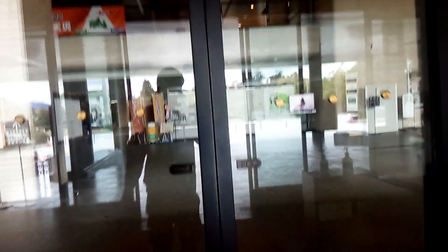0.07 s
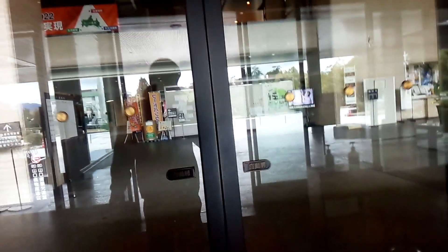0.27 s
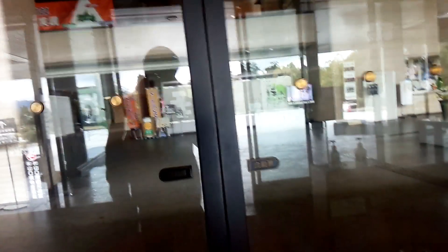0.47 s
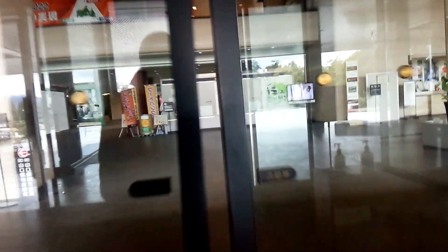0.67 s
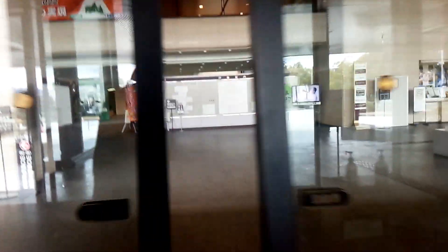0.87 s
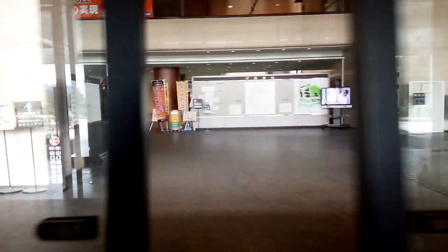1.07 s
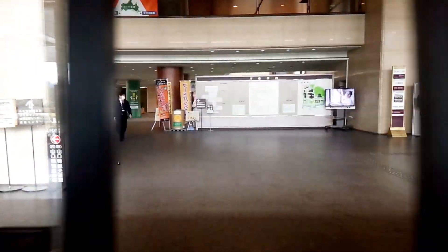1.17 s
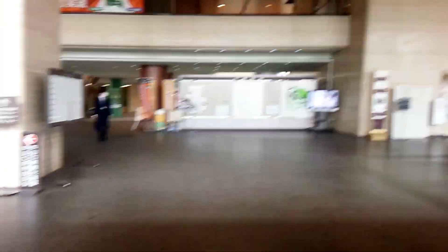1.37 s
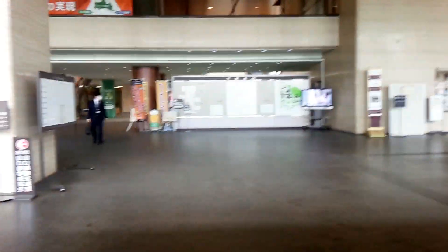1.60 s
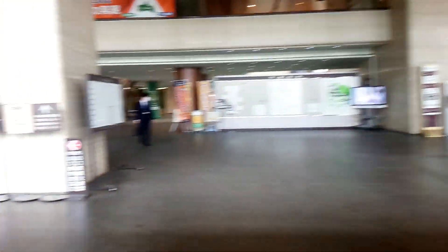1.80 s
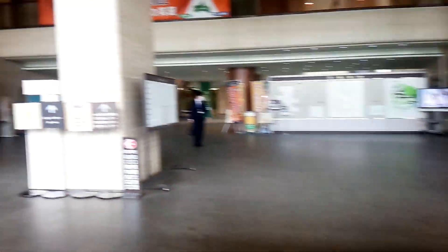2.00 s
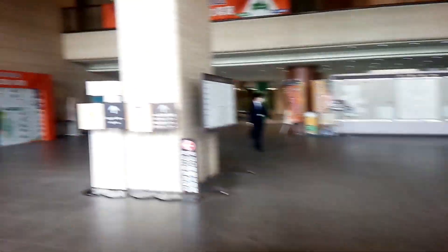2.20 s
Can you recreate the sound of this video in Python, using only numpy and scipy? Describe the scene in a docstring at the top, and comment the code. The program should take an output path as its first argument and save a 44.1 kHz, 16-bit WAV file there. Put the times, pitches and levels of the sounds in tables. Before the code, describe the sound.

Heavy sliding glass doors at a lobby entrance, heard from the threshold: soft hum, unlocking clack, booming rollers on the track, a bright catch snap, a later stop clack, then slowing and quiet.

```python
"""Entrance of a large stone lobby, heard from the threshold as automatic glass doors slide open.
Behind them lies a faint steady background of shaped noise, with a knock dying away at the start.
The drive hums in low wavering tones; knocks ring as resonant noise and the seals scrape and hiss as grains.
Then the leaves rumble and roll along their track: random contacts ringing the glass, carriages and rail.
Sharp metal clicks, a catch and a carriage stop stand out; clicks and knocks carry the hall's reverberation."""
import sys
import numpy as np
from scipy import signal
from scipy.fft import rfft, irfft
from scipy.io import wavfile
from scipy.ndimage import uniform_filter1d

SR = 44100
rng = np.random.default_rng(int(sys.argv[2]) if len(sys.argv) > 2 else 0)


def store_wav(level_fs):
    """Save 16-bit WAV to argv[1]."""
    pcm = np.round(np.clip(np.atleast_2d(level_fs), -1, 1) * 32767)
    wavfile.write(sys.argv[1], SR, pcm.T.astype(np.int16))


N = 99225
TIME_S = np.arange(N) / SR

# steady lobby background, spectrum: (frequency [Hz], relative density [dB per Hz])
BACKGROUND_SPECTRUM = [(30, 2.5), (60, -1.5), (150, 6.5), (290, -3.5), (500, -10), (1000, -17),
                       (1500, -23.5), (2100, -24), (3300, -27.5), (5500, -35.5), (7500, -29.5), (9500, -28),
                       (11500, -32), (15500, -34)]
# its loudness: (time [s], level [dB])
BACKGROUND_LEVEL = [(0, -41.5), (.42, -45.5), (1.5, -44), (2.25, -47)]
# knock dying away at the start, spectrum: (frequency [Hz], relative density [dB per Hz])
FADING_SPECTRUM = [(500, -6), (1000, 12), (1400, 13), (2000, 1), (3300, -8), (5500, -37), (9500, -14),
                   (15000, -44)]
# hum of the drive: (frequency [Hz], rms level [dB])
DRIVE_TONES = [(83, -38.5), (126, -40), (205, -48)]
# seals scraping apart, spectrum: (frequency [Hz], relative density [dB per Hz])
SCRAPE_SPECTRUM = [(640, -20), (900, 11), (1180, -39), (1800, -3.5), (2350, 2.5), (3300, -15), (3900, -5),
                   (4800, -26.5), (6000, -47)]
# fine hiss along the leaves, spectrum: (frequency [Hz], relative density [dB per Hz])
HISS_SPECTRUM = [(4000, -27), (5900, -12.5), (7400, -3), (9500, 0.5), (11000, -9.5), (15500, -18)]
# small steel parts, resonances: (frequency [Hz], width [Hz], relative level [dB])
TICK_MODES = [(6830, 510, -0.5), (9020, 1230, 0.5), (10040, 630, 7)]
# metal clicks: (time [s], ringing tick [dB], broad crack [dB], clack of the housing [dB])
CLICKS = [(0.59, -39, -66, -43), (0.6429, -27, -48, -40.5), (0.86, -44, -64.5, -54),
          (0.971, -38.5, -63, -51), (0.999, -21.5, -34.5, -36.5), (1.006, -33, -39, -33),
          (1.413, -62, -78, -52), (1.5585, -25.5, -38.5, -34.5), (1.566, -43, -36.5, -43)]
# the lock lets go: (time [s], level [dB])
UNLOCK = [(0.467, -46), (0.482, -35)]
# broad crack of a click, spectrum: (frequency [Hz], relative density [dB per Hz])
CRACK_SPECTRUM = [(2000, -34), (4000, -2), (7300, 0.5), (11000, -0.5), (13000, -1.5), (15500, -12)]
# housing behind the clicks, resonances: (frequency [Hz], width [Hz], relative level [dB])
CLACK_MODES = [(877, 235, 4.5), (1400, 94, 10), (1687, 95, 7.5), (2020, 105, 2.5), (2300, 205, 2),
               (3000, 1070, -2.5), (3910, 570, 1.5), (5420, 380, -22)]
# blows of the catch snapping over: (time [s], peak level [dB])
CATCH_BLOWS = [(1.0, -17.5), (1.014, -23)]
# steel catch, resonances: (frequency [Hz], width [Hz], relative level [dB])
CATCH_MODES = [(1490, 16.1, -16), (3865, 12, -11), (7040, 36, -13), (8620, 28, 1), (10250, 280, -4)]
# a carriage hits its stop and bounces: (time [s], peak level [dB])
STOP_BLOWS = [(1.5603, -15.5), (1.5683, -21)]
# carriage stop, resonances: (frequency [Hz], width [Hz], relative level [dB])
STOP_MODES = [(1103, 85, 5), (1655, 18, 9), (2040, 26, 2), (2320, 68, -2), (4180, 32, -1), (5120, 110, -6),
              (9400, 120, 2.5), (10600, 120, -5)]
# knocks of the leaves and carriages: (time [s], frame [dB], glass thump [dB])
KNOCKS = [(0.206, -71, -34.5), (0.618, -27.5, -56), (0.674, -36.5, -29.5), (0.721, -45, -29.5),
          (1.254, -44, -37), (1.56, -32, -45), (2.227, -59, -46)]
# door frame, resonances: (frequency [Hz], width [Hz], relative level [dB])
FRAME_MODES = [(550, 130, -3.5), (632, 12, 5), (767, 43, 3), (888, 200, -1), (1240, 200, -1.5)]
# thump of the glass, resonances: (frequency [Hz], width [Hz], relative level [dB])
THUMP_MODES = [(141, 33, 3), (179, 32, 15.5), (234, 32, 8), (296, 110, 2.5)]
# low rumble of the leaves: (time [s], level [dB])
RUMBLE_LEVEL = [(0.0, -38), (0.06, -81), (0.38, -38), (0.53, -42), (0.64, -35), (0.8, -26.5), (0.83, -37),
                (0.85, -33), (1.2, -45), (1.39, -36.5), (1.76, -48.5), (1.96, -41.5), (2.02, -51),
                (2.25, -52.5)]
# glass leaves, resonances: (frequency [Hz], width [Hz], relative level [dB])
LEAF_MODES = [(52.7, 11.5, -6), (66.5, 10.4, -3.5), (94.2, 30, 3.5)]
# boom of the glass, before its tone and side parts are weighted: (time [s], level [dB])
BOOM_LEVEL = [(0, -41), (.18, -52), (.25, -42), (.55, -38.5), (.63, -24.5), (.7, -23), (.74, -22),
              (.8, -30.5), (.88, -23.5), (.92, -35.5), (1.04, -35.5), (1.25, -50.5), (1.3, -24.5),
              (1.345, -38), (1.385, -28), (1.44, -50), (1.485, -28), (1.59, -32.5), (1.66, -43.5),
              (1.9, -48), (2.25, -66)]
# centre pitch of the boom, which shifts as the leaves move: (time [s], frequency [Hz])
BOOM_PITCH = [(.6, 151.2), (.69, 142.6), (.76, 145), (.85, 132.1), (1.29, 162.9), (1.38, 146.6)]
# weaker resonances beside the boom: (frequency [Hz], width [Hz], relative level [dB])
BOOM_SIDE_MODES = [(124.5, 20.6, -9.5), (160.4, 19.3, -6)]
# rollers on the track, before a 2.5 dB trim and random swings: (time [s], level [dB])
ROLL_LEVEL = [(.5, -46), (.6, -33.5), (.67, -26), (.77, -26.5), (.83, -30.5), (.89, -30.5), (1.0, -39),
              (1.15, -36.5), (1.22, -46.5), (1.275, -26.5), (1.33, -33.5), (1.6, -33.5), (1.84, -34),
              (2.02, -40.5), (2.07, -49), (2.13, -36), (2.21, -50), (2.25, -36)]
# carriages, resonances: (frequency [Hz], width [Hz], relative level [dB])
CARRIAGE_MODES = [(206.8, 11, 1.5), (234, 20.7, 2), (258.7, 25.3, 3), (287, 15, 3.5), (314, 21.4, 0.5)]
# shared by grinding and rail, before swings, dulling and rail trim: (time [s], level [dB])
GRIND_LEVEL = [(.5, -47), (.545, -44.5), (.6, -46), (.65, -38.5), (.73, -37.5), (.83, -45), (.97, -46.5),
               (1.08, -41), (1.22, -39.5), (1.28, -35), (1.38, -36), (1.53, -39.5), (1.6, -37), (1.77, -40),
               (1.86, -38.5), (1.98, -44), (2.08, -49), (2.21, -50.5), (2.24, -44)]
# grinding of the track, spectrum: (frequency [Hz], relative density [dB per Hz])
GRIND_SPECTRUM = [(350, -1), (570, 4), (750, 0), (1050, 1.5), (1250, -5), (1620, -9), (1850, -22.5),
                  (3500, -29), (5500, -71)]
# rail, resonances: (frequency [Hz], width [Hz], relative level [dB])
RAIL_MODES = [(383.5, 20.2, 1), (429, 34.5, -0.76), (509.3, 34.4, -4.1)]

DRIVE_START_S, DRIVE_END_S, DRIVE_FADE_S = 0.22, 0.522, 0.045
BRAKE_START_S, BRAKE_END_S, BRAKE_DB = 1.6, 2.08, -42.5
BRAKE_FIRST_HZ, BRAKE_LAST_HZ = 550, 439.4
DRIVE_WAVER = 0.028  # fraction of the pitch

SCRAPE_START_S, SCRAPE_ATTACK_S, SCRAPE_END_S, SCRAPE_RELEASE_S = 0.466, 0.0084, 0.65, 0.12
HISS_START_S, HISS_ATTACK_S, HISS_END_S, HISS_RELEASE_S = 0.466, 0.025, 0.75, 0.18
SCRAPE_DB, HISS_DB, SQUEAK_DB = -44, -50.5, -43.5
SQUEAK_HZ, SQUEAK_SAG_HZ_PER_S, SQUEAK_END_S = 2996, 2400, 0.53

TICK_RISE_S, TICK_DECAY_S = 0.001, 0.002
CRACK_RISE_S, CRACK_DECAY_S = 0.0057, 0.0045
CLACK_RISE_S, CLACK_DECAY_S = 0.002, 0.02
CHATTER_DB, CHATTER_DECAY_S = -25.5, 0.022  # level relative to the tick
KNOCK_RISE_S, KNOCK_DECAY_S, THUMP_RISE_S, THUMP_DECAY_S = 0.0024, 0.025, 0.0071, 0.031

# the hall: weight [dB] and time to fall by 60 dB [s]
EARLY_DB, EARLY_T60_S = -3.5, 0.57
TICK_HALL_DB, TICK_T60_S = -9.5, 0.8
CLACK_HALL_DB, CLACK_T60_S = -4, 0.61
KNOCK_HALL_DB, KNOCK_T60_S = -6, 1

BOOM_WAVER, BOOM_TONE_DB, BOOM_SIDE_DB = 0.016, -5, -3  # waver is a fraction of the pitch
ROLL_SWING_DB, GRIND_SWING_DB, RAIL_DB = 2.66, 1.02, -1
DULL_START_S, DULL_DB_PER_S, DULL_ABOVE_HZ = 1.73, 45, 1330


def from_db(db):
    """Decibels to gain."""
    return 10 ** (np.asarray(db) / 20)


def rms_one(x):
    """Scale to unit rms."""
    return x / np.sqrt(np.mean(x ** 2) + 1e-20)


def lowpass(x, order, hz):
    """Butterworth filter that dulls a sound above hz."""
    return signal.sosfilt(signal.butter(order, hz, fs=SR, output="sos"), x)


def bandpass(x, low_hz, high_hz):
    """Butterworth filter that keeps one band of a sound."""
    return signal.sosfilt(signal.butter(2, [low_hz, high_hz], "band", fs=SR, output="sos"), x)


def level(rows):
    """Gain over time from (time [s], level [dB]) points; fades in over the 50 ms before the first."""
    times, db = np.transpose(rows)
    fade_in = np.clip(1 + (TIME_S - times[0]) * 20, 0, 1)
    return from_db(np.interp(TIME_S, times, db)) * fade_in


def drift(rate_hz):
    """Slow random wandering with spread 1: noise through two equal low-pass poles."""
    step = 40  # samples between drawn points
    pole = np.exp(-2 * np.pi * rate_hz * step / SR)
    noise = rng.standard_normal(N // step + 2002)
    settled = signal.lfilter([1], [1, -2 * pole, pole ** 2], noise)[2000:]
    return np.interp(np.arange(N) / step, np.arange(len(settled)), rms_one(settled))


def coloured(x, spectrum):
    """Give a steady excitation a spectrum, read on a log-frequency axis; rms 1."""
    hz = np.arange(N // 2 + 1) * SR / N
    table_hz, table_db = np.transpose(spectrum)
    db = np.interp(np.log(hz + 1), np.log(table_hz), table_db)
    return rms_one(irfft(rfft(x) * from_db(db), N))


def grains(per_second, size_db):
    """Dense random micro-contacts of uneven size and either sign; rms 1."""
    sizes = from_db(size_db * np.minimum(rng.exponential(1, N), 4))
    signs = rng.choice([-1, 1], N)
    contact = rng.random(N) < per_second / SR
    return rms_one(sizes * signs * contact)


def evened(x, span_s):
    """Hold the short-term level of a vibration near 1."""
    power = uniform_filter1d(x ** 2, max(int(span_s * SR), 2))
    return x / np.sqrt(np.abs(power) + 1e-9)


def resonate(x, modes):
    """Parallel two-pole resonances with alternating signs, scaled for unit gain on white noise."""
    out, power = 0, 0
    for k, (hz, width_hz, db) in enumerate(modes):
        radius = np.exp(-np.pi * width_hz / SR)
        gain = from_db(db)
        b = (1 - radius ** 2) / 2
        poles = [1, -2 * radius * np.cos(2 * np.pi * hz / SR), radius ** 2]
        out = out + (-1) ** k * gain * signal.lfilter([b, 0, -b], poles, x + 1e-18)
        power += gain ** 2 * b
    return out / np.sqrt(power)


def burst(start_s, rise_s, decay_s):
    """A straight rise, then an exponential decay."""
    rise = np.clip((TIME_S - start_s) / rise_s, 0, 1)
    return rise * np.exp(-np.maximum(TIME_S - start_s - rise_s, 0) / decay_s)


def stroke(start_s, attack_s, end_s, release_s):
    """A rubbing contact: a straight attack, a hold, then an exponential release."""
    attack = np.clip((TIME_S - start_s) / attack_s, 0, 1)
    return attack * np.exp(-np.maximum(TIME_S - end_s, 0) / release_s)


def in_hall(envelope, tail_db, tail_t60_s):
    """Envelope of a blow plus early and late diffuse reverberation, whose energies add and die away."""
    blow_power = envelope ** 2
    power = blow_power
    for db, t60_s in ((EARLY_DB, EARLY_T60_S), (tail_db, tail_t60_s)):
        keep = from_db(-120 / (t60_s * SR))  # acts on power: 60 dB down after t60_s
        power = power + from_db(db) ** 2 * signal.lfilter([1 - keep], [1, -keep], blow_power + 1e-18)
    return np.sqrt(power)


def metal():
    """Noise, as dense contacts, ringing the small steel parts; level near 1."""
    ringing = resonate(rng.standard_normal(N), TICK_MODES)
    return evened(bandpass(ringing, 7500, 9460), 0.0078)


def struck(blows, modes):
    """Hard contacts set a part ringing as an impulse would; each blow is given by its peak level."""
    ring = resonate(signal.unit_impulse(N), modes)
    hits = sum(from_db(db) * np.interp(TIME_S - s, TIME_S, ring, left=0) for s, db in blows)
    return hits / np.abs(ring).max()


def lobby():
    """Shaped noise as the faint steady background, and an earlier knock dying away in the hall."""
    background = level(BACKGROUND_LEVEL) * coloured(rng.standard_normal(N), BACKGROUND_SPECTRUM)
    knock = from_db(-38) * burst(0.0052, TICK_RISE_S, decay_s=0.012)
    fading = in_hall(knock, KNOCK_HALL_DB, KNOCK_T60_S)
    return background + fading * coloured(rng.standard_normal(N), FADING_SPECTRUM)


def drive():
    """Low tones wavering together as the motor pulls the leaves, and a faint falling whine as it brakes."""
    fade_in = np.clip((TIME_S - DRIVE_START_S) / DRIVE_FADE_S, 0, 1)
    fade_out = np.clip((DRIVE_END_S - TIME_S) / DRIVE_FADE_S, 0, 1)
    turning = 2 * np.pi * np.cumsum(1 + DRIVE_WAVER * drift(14.4)) / SR  # phase of a 1 Hz tone
    tones = sum(from_db(db + 2 * drift(37)) * np.sin(hz * turning) for hz, db in DRIVE_TONES)
    hum = fade_in * fade_out * tones

    braking = np.clip((TIME_S - BRAKE_START_S) / (BRAKE_END_S - BRAKE_START_S), 0, 1)
    pitch = BRAKE_FIRST_HZ + (BRAKE_LAST_HZ - BRAKE_FIRST_HZ) * braking
    pitch = pitch * (1 + DRIVE_WAVER * drift(16.7))
    swell = from_db(BRAKE_DB + 2 * drift(28)) * np.sin(np.pi * braking)
    whine = swell * np.sin(2 * np.pi * np.cumsum(pitch) / SR)
    return np.sqrt(2) * (hum + whine)  # sine peaks from rms levels


def seals():
    """Rubbing grains scrape and hiss as the leaves part; a juddering, falling tone squeaks hoarsely."""
    scrape = stroke(SCRAPE_START_S, SCRAPE_ATTACK_S, SCRAPE_END_S, SCRAPE_RELEASE_S)
    scrape = scrape * from_db(SCRAPE_DB + drift(30)) * coloured(grains(7000, size_db=3.5), SCRAPE_SPECTRUM)
    hiss = stroke(HISS_START_S, HISS_ATTACK_S, HISS_END_S, HISS_RELEASE_S)
    hiss = hiss * from_db(HISS_DB + 0.54 * drift(27)) * coloured(grains(12000, size_db=4), HISS_SPECTRUM)

    pitch = SQUEAK_HZ - SQUEAK_SAG_HZ_PER_S * np.clip(TIME_S - SCRAPE_START_S, 0, 0.5)
    phase = 2 * np.pi * np.cumsum(pitch) / SR
    judder = rms_one(lowpass(rng.standard_normal((2, N)), 2, 260))  # blurs the tone into a narrow band
    hoarse = judder[0] * np.cos(phase) + judder[1] * np.sin(phase)
    squeak_shape = stroke(SCRAPE_START_S, HISS_ATTACK_S, SQUEAK_END_S, SCRAPE_RELEASE_S)
    return scrape + hiss + from_db(SQUEAK_DB) * squeak_shape * hoarse


def rattle():
    """The small metal parts shiver on as the doors gather speed: one decaying burst of ringing."""
    return from_db(-38.5) * burst(0.645, CLACK_RISE_S, decay_s=0.067) * metal()


def knocks():
    """Jolts ring the frame and thump the glass: decaying resonant noise with the hall behind it."""
    frame = sum(from_db(db) * burst(s, KNOCK_RISE_S, KNOCK_DECAY_S) for s, db, _ in KNOCKS)
    glass = sum(from_db(db) * burst(s, THUMP_RISE_S, THUMP_DECAY_S) for s, _, db in KNOCKS)
    frame_ring = evened(resonate(rng.standard_normal(N), FRAME_MODES), 0.0126)
    glass_ring = evened(resonate(rng.standard_normal(N), THUMP_MODES), 0.0186)
    frame = in_hall(frame, KNOCK_HALL_DB, KNOCK_T60_S) * frame_ring
    glass = in_hall(glass, KNOCK_HALL_DB, KNOCK_T60_S) * glass_ring
    return lowpass(frame, 4, 2000) + lowpass(glass, 2, 650)


def clicks():
    """Each click is a hard metal tick with a brief chatter, a broad crack, and a clack of the housing."""
    tick, crack, clack = np.zeros((3, N))
    for s, tick_db, crack_db, clack_db in CLICKS:
        chatter = from_db(CHATTER_DB) * burst(s, CLACK_RISE_S, CHATTER_DECAY_S)
        tick += from_db(tick_db) * (burst(s, TICK_RISE_S, TICK_DECAY_S) + chatter)
        crack += from_db(crack_db) * burst(s, CRACK_RISE_S, CRACK_DECAY_S)
        clack += from_db(clack_db) * burst(s, CLACK_RISE_S, CLACK_DECAY_S)
    for s, db in UNLOCK:  # the lock sounds through the same housing
        clack += from_db(db) * burst(s, CRACK_RISE_S, CRACK_DECAY_S)
    housing = evened(lowpass(resonate(rng.standard_normal(N), CLACK_MODES), 2, 5350), 0.0046)
    tick = in_hall(tick, TICK_HALL_DB, TICK_T60_S) * metal()
    crack = in_hall(crack, TICK_HALL_DB, TICK_T60_S) * coloured(rng.standard_normal(N), CRACK_SPECTRUM)
    return tick + crack + in_hall(clack, CLACK_HALL_DB, CLACK_T60_S) * housing


def catch_and_stop():
    """The steel catch rings as it snaps over; later a carriage rings its stop and bounces."""
    return struck(CATCH_BLOWS, CATCH_MODES) + struck(STOP_BLOWS, STOP_MODES)


def rumble():
    """Bumps in the track shake the leaves at their resonances; a wavering tone booms in the glass."""
    shake = evened(bandpass(resonate(grains(500, size_db=-3), LEAF_MODES), 42, 115), 0.044)
    side = evened(bandpass(resonate(grains(500, size_db=7), BOOM_SIDE_MODES), 100, 200), 0.066)
    pitch = np.interp(TIME_S, *np.transpose(BOOM_PITCH)) * (1 + BOOM_WAVER * drift(13.7))
    tone = np.sqrt(2) * np.sin(2 * np.pi * np.cumsum(pitch) / SR)
    boom = from_db(BOOM_TONE_DB) * tone + from_db(BOOM_SIDE_DB) * side
    return level(RUMBLE_LEVEL) * shake + level(BOOM_LEVEL) * boom


def rollers():
    """Wheels over fine roughness: contacts ring carriages and rail in a dull roll, with brighter grinding."""
    roll = evened(bandpass(resonate(grains(2500, size_db=2), CARRIAGE_MODES), 184, 380), 0.04)
    roll = roll * from_db(ROLL_SWING_DB * drift(22.4) - 2.5)
    grind = evened(coloured(grains(3000, size_db=1), GRIND_SPECTRUM), 0.14)
    grind = grind * from_db(GRIND_SWING_DB * drift(31))
    # the grinding dulls as the leaves slow down and move away
    dull = signal.sosfiltfilt(signal.butter(4, DULL_ABOVE_HZ, fs=SR, output="sos"), grind)
    treble_gain = from_db(-DULL_DB_PER_S * np.maximum(TIME_S - DULL_START_S, 0))
    grind = dull + (grind - dull) * treble_gain
    rail = from_db(RAIL_DB) * evened(resonate(grains(2500, size_db=1), RAIL_MODES), 0.044)
    return roll * level(ROLL_LEVEL) + (grind + rail) * level(GRIND_LEVEL)


def scene():
    """Lobby and doors, summed to one channel as heard from the threshold."""
    surroundings = lobby() + drive()
    details = seals() + rattle() + knocks() + clicks() + catch_and_stop()
    leaves = rumble() + rollers()
    return (surroundings + details + leaves)[None]


def record(dry):
    """The microphone drops the deepest bass; a steep filter cuts the top."""
    thin = signal.sosfilt(signal.butter(4, 38, "high", fs=SR, output="sos"), dry)
    return signal.sosfilt(signal.ellip(10, 0.2, 80, 15900, fs=SR, output="sos"), thin)


dry = scene()
out = record(dry)
store_wav(out)
```